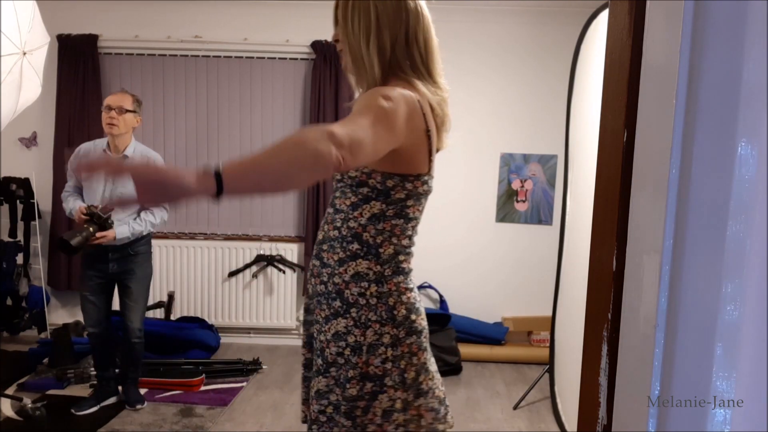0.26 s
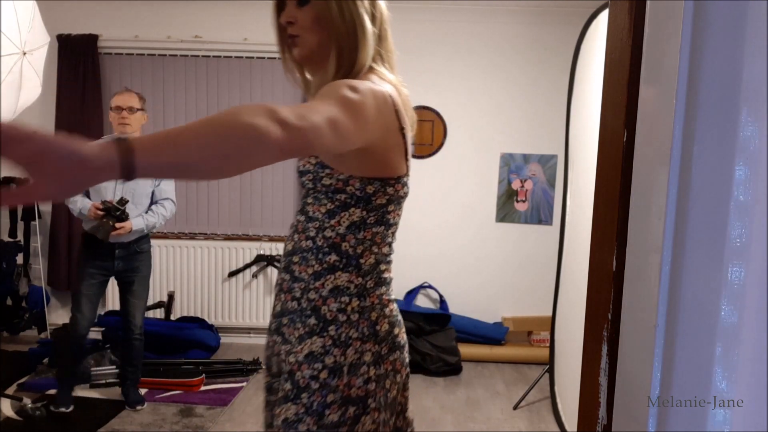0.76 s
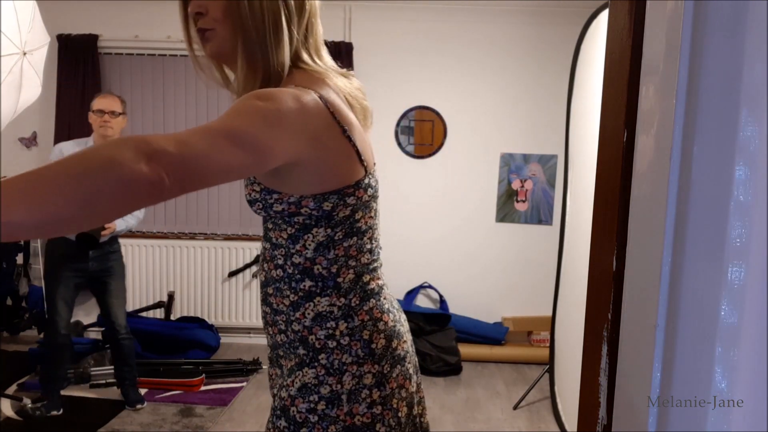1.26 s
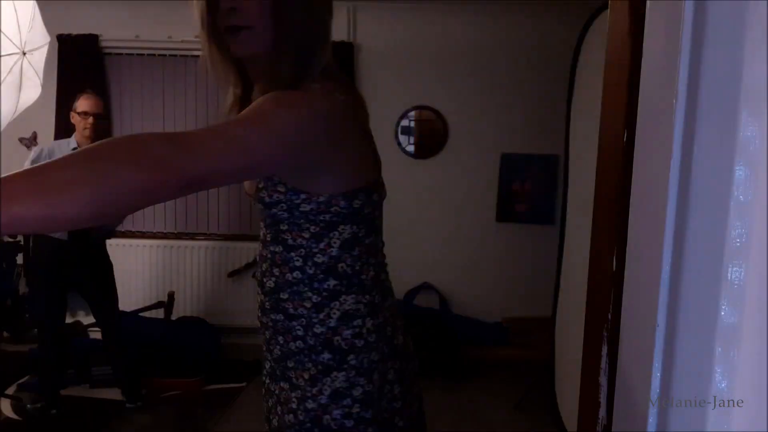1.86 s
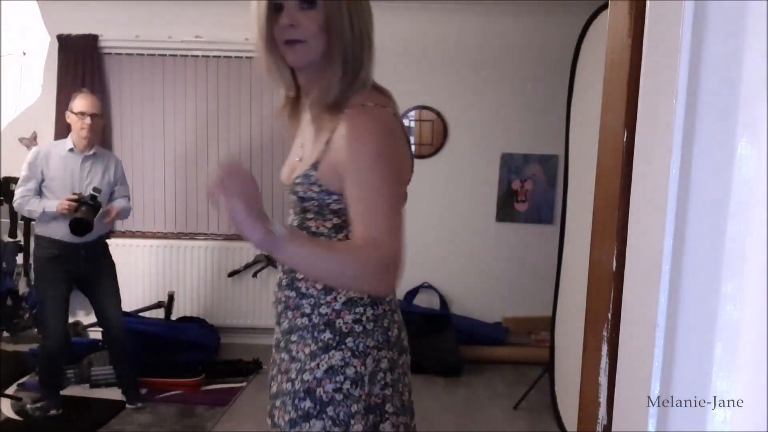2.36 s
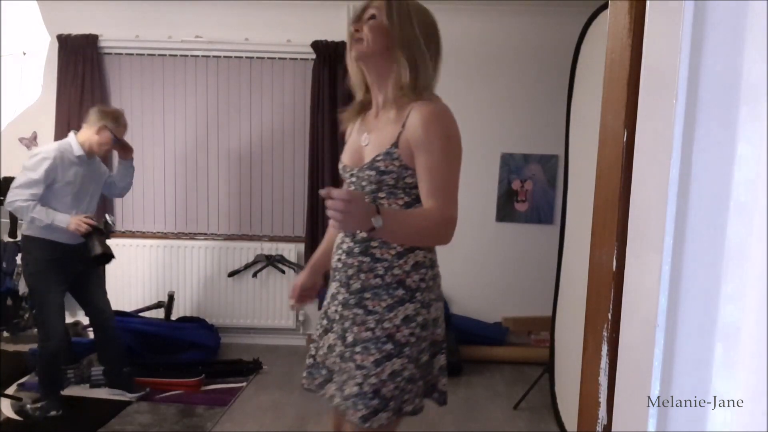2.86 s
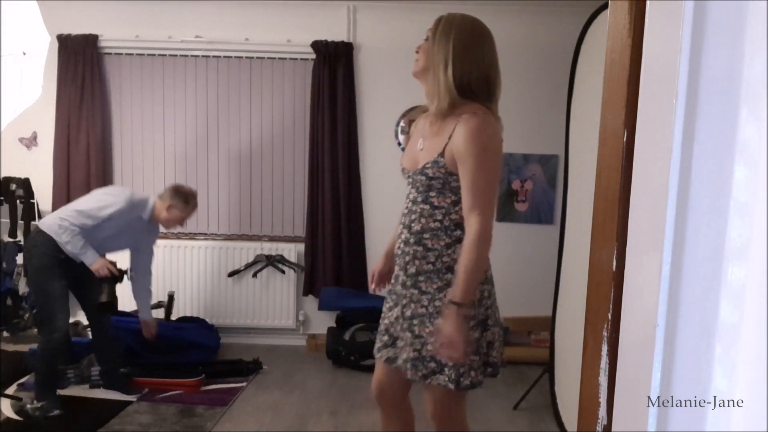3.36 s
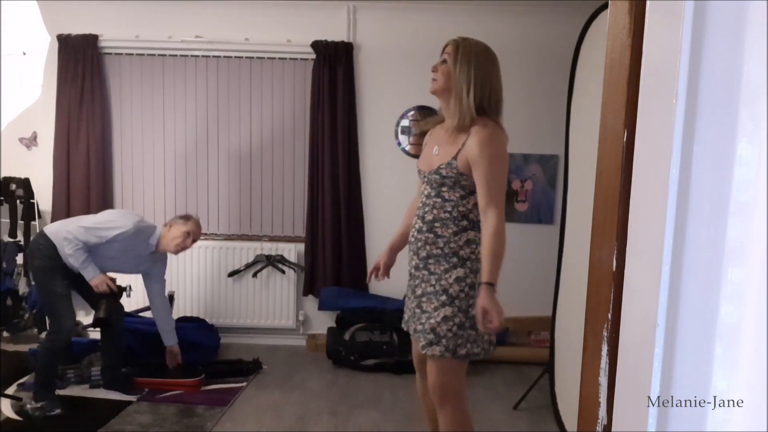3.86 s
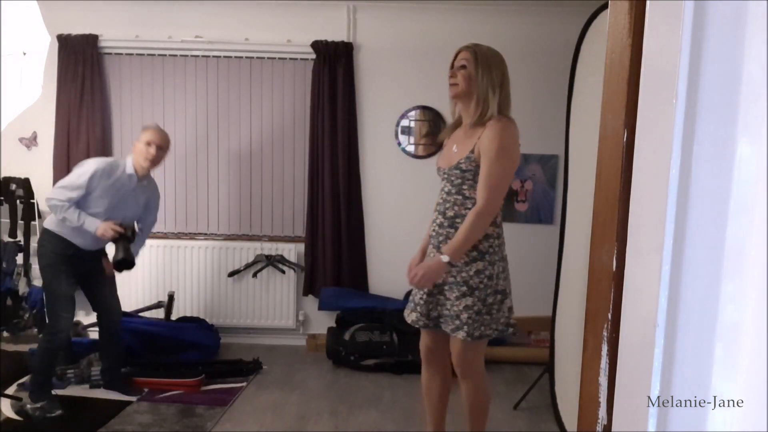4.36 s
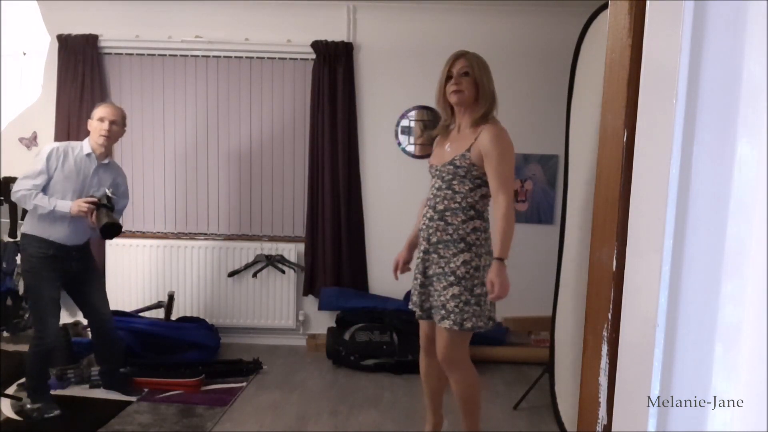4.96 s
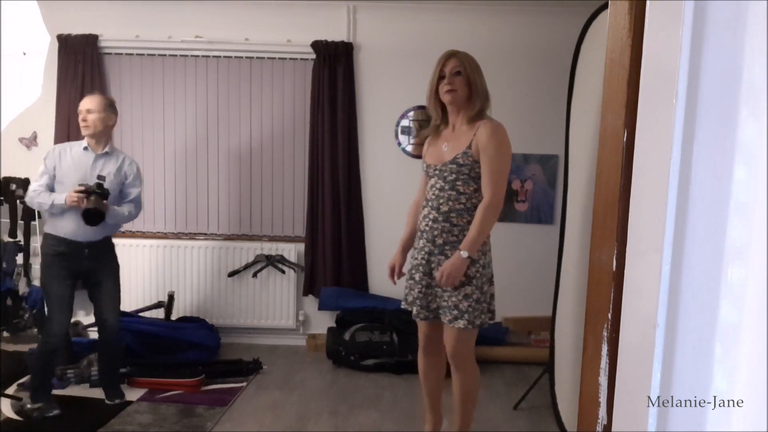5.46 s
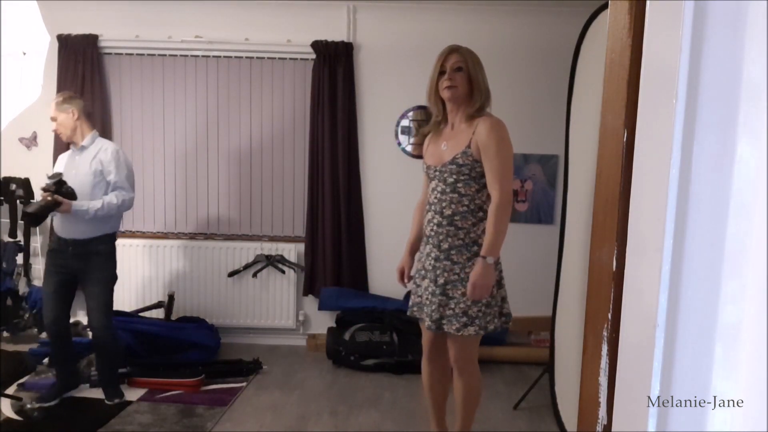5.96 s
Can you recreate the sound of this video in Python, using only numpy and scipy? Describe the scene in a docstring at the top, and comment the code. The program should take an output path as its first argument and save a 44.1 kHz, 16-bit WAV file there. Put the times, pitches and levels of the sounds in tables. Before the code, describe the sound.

Hard-heeled shoes knock irregularly on laminate in a small furnished room, with faint scuffs, a sharp clack and a brief board creak over low hiss.

```python
"""Hard-heeled shoes knock on a laminate floor in a small furnished room as someone steps about.
Each touch is a pulse shaped in six bands, which rings the floor modes and a decaying-noise room; joists thump below.
Soles scuff as swelling noise, ticks, clacks and snaps leave thin rings, a board creaks and squeaks.
Behind lie noise hiss and a low building hum, picked up by a phone microphone with a noise suppressor
that lets its hiss swell with every sound and cuts the tails short."""
import sys
import numpy as np
from scipy import signal
from scipy.io import wavfile
from scipy.ndimage import uniform_filter1d

SR = 44100
rng = np.random.default_rng(int(sys.argv[2]) if len(sys.argv) > 2 else 0)


def output_pcm(signal):
    """Save a mono or channel-first signal as 16-bit PCM at the path in sys.argv[1].

    Samples are clipped to [-1, 1] before scaling.
    """
    pcm = np.clip(np.atleast_2d(signal).T, -1, 1) * 32767
    wavfile.write(sys.argv[1], SR, np.round(pcm).astype(np.int16))


def volts_from_decibels(level):
    """Turn decibel levels (scalar or array-like) into linear amplitude factors."""
    exponent = np.asarray(level, float) / 20
    return 10 ** exponent


N = 274037  # length in samples

# heel and sole knocks: t/s, level/dB, dullness/(dB per octave), grit/dB, crispness of the first blow/dB,
# hollowness as extra low midrange/dB
KNOCKS = [(0.0894, -30, 20.5, -60, -7.5, 15), (0.1613, -28, 1.56, -95, 6.5, 4.5),
          (0.2801, -52.5, -6, -52, -7, 1.5), (0.6445, -39, 8, -56.5, 0, -5), (0.669, -26, 6.5, -52, 9, 4.5),
          (0.853, -56, 20, -102, -18, -1), (2.422, -33.5, 4, -89, 7, -1), (2.473, -47.5, 25, -55, -1, 0),
          (2.5419, -29, 3, -43.5, 9.5, 0.5), (3.078, -30, 3.5, -53.5, -2, -7.5),
          (3.1579, -23.5, 0, -62, 6.5, -2.6), (3.65, -56, 1.5, -57.5, 0, 8.5),
          (3.717, -30, 3, -43.5, 5, -10.5), (3.817, -21.5, 2, -74.5, 1, -1.3),
          (4.274, -41.5, 25.5, -47, -1.5, 6.5), (4.306, -17.5, 1.5, -38.5, 5, 0.5),
          (4.806, -41.5, 7.5, -70, 0, -5), (4.8265, -24.5, 1.5, -99, 2, -0.2), (5.03, -40, 7, -59, -9, 2),
          (5.3927, -27, 3, -64, -2, -3.5), (5.792, -57.5, 0, -77.5, -6.5, -7),
          (6.031, -29.5, 5.5, -63.5, -10, 4.5)]
# bright snaps: t/s, level/dB, strongest f/Hz, fall below/(dB per octave), fall above/(dB per octave)
SNAPS = [(3.9159, -26.5, 1416, 8.5, 1.67), (4.334, -46, 700, 18, 1.5), (4.806, -52.5, 6390, 5, 2.5),
         (5.863, -59.5, 6150, 4.5, 3.5)]
SNAP_CRISP_DB = -4
# bands of a touch: low f/Hz, high f/Hz, direct level/dB, room level/dB, share of a firm knock/dB, share of grit/dB
TOUCH_BANDS = [(123.5, 439, 5.5, -8.5, -0.5, -49), (387.3, 916, 8, -9.5, 1.34, -33.5),
               (935, 1784, 7.5, -3, -4, -2), (1710, 5400, 15, 3.5, -16.5, 2),
               (4950, 8090, 20.5, 2.5, -30, -3.5), (9860, 15540, 21.5, 14, -39.5, -9.5)]
# where the walker stands: t/s, distance (0 near, 1 far), give of the boards there as extra bass/dB
WALK = [(0.1, 0.11, 7), (0.7, 0, -0.5), (2.5, 0, -6), (3.2, 0.93, 0), (3.8, 0.96, -1.5), (4.3, 0.78, -3),
        (4.8, 0.39, -14.5), (5.4, 0.59, 5.5), (6.1, 0.38, -14)]
# floor and room ring: f/Hz, level from the near spot/dB, level from the far spot/dB, t60/s before the cap below
FLOOR_MODES = [(132.1, -10.5, -9, 0.6), (164.6, -23.5, -11.5, 0.56), (193.3, -16, -5, 0.53),
               (223.3, -9, -2.5, 0.96), (279.7, 0, 4.5, 0.11), (291.7, -9.5, -2.5, 0.72),
               (348, -15, -10.5, 0.87), (375.4, -1, -32.5, 0.46), (399.7, 7.5, -11.5, 0.26),
               (488.6, -0.5, -7, 0.06), (529, -6.5, -20.5, 0.36), (625.5, -3.5, -12, 0.35),
               (721, -17, -8, 0.43), (872, -25.5, 1.5, 0.086), (965, -4, -3, 0.15), (1240, -19, -11, 0.18),
               (1535, -12.5, -16.5, 0.51), (2290, -9, -18.5, 0.78)]
LONGEST_RING_S = .4
MODE_SPREAD_DB = 3.3  # random spread of each mode's strength from touch to touch
# how long the room holds each pitch: f/Hz, t60/s
ROOM_T60 = [(150, 0.46), (600, 0.34), (2000, 0.39), (6000, 0.39), (11000, 0.32), (16000, 0.26)]
# tone of the reflections: f/Hz, relative level/dB
ROOM_COLOUR = [(200, -5.5), (500, 5.5), (900, 0.5), (1600, -8), (2000, -1.5), (5000, 1), (8500, 5),
               (11000, -0.5), (15500, -2)]
# the joists give under each knock
THUMP_HZ, THUMP_DB, THUMP_T60_S = 78, -30.5, 0.11
# short narrow clacks of hard parts: t/s, level/dB before the band-pass, f/Hz, t60/s
CLACKS = [(1.734, -41, 6860, 0.0045), (1.811, -19.5, 6030, 0.006), (1.811, -26, 8300, 0.003),
          (1.811, -11, 12700, .001), (1.815, -34, 1770, .003), (2.488, -29, 4630, .002),
          (2.563, -43, 4630, 0.0018), (4.465, -26, 3710, .004)]
CLACK_ROOM_DB = -24  # what a clack sends into the room
# thin ringing tones of ticks and of a snap: t/s, level/dB, f/Hz, t60/s
TICKS = [(1.16, -55, 6750, .35), (1.298, -63, 13050, .15), (1.561, -61, 10480, .2), (0.281, -29, 1050, .06),
         (3.918, -36, 1290, .4), (3.918, -42, 2050, .45), (3.918, -44, 6400, .3)]
# a board creaks under load: start t/s, end t/s, level/dB
CREAK = (3.648, 3.712, -42)
CREAK_SLIPS_PER_S = 1600
# resonances of the creaking board: f/Hz, level/dB, t60/s
CREAK_MODES = [(600, -4, .03), (715, -2, .035), (920, -4, .04), (2200, -18, .04)]
# the joint sings briefly: start t/s, end t/s, level/dB, from f/Hz, to f/Hz
SQUEAK = (3.658, 3.697, -51, 1590, 1510)
# sole and cloth sliding: start t/s, peak t/s, end t/s, peak level/dB before the low cut, lowest f/Hz
SCUFFS = [(1.04, 1.1, 1.26, -42, 1200), (1.9, 2.0, 2.16, -44, 4000), (2.92, 3.04, 3.09, -57, 2000),
          (5.03, 5.07, 5.17, -54, 1200)]
# tone of the sliding: f/Hz, relative level/(dB per Hz)
SCUFF = [(710, -61), (1200, -19), (2020, -8), (4260, 1.5), (8820, -11), (12500, -5), (16000, -15)]
# tone of the hiss: f/Hz, relative level/(dB per Hz)
HISS = [(41, -43), (70, -20), (101, -7), (129, -16.5), (256, -19.5), (606, -23), (815, -27.5),
        (1070, -26.5), (2120, -29), (5750, -32.5), (6450, -31), (7560, -44), (16000, -22.5)]
HISS_OPEN_DB = -57  # with the suppressor open
# building hum: f/Hz, width/Hz, level/dB
HUM = [(43.26, 2, -59), (65.5, 5.4, -69.5), (208, 0.59, -72)]
# how alike left and right are in noise: f/Hz, likeness (0-1)
LIKENESS = [(60, .9), (150, .97), (300, .9), (600, .68), (1200, .35), (2500, .08), (8000, 0)]
PAN_DB = -2  # left relative to right
# suppressor: turns down when closed, opens fully between two levels
CLOSED_DB, OPEN_AT_DB, SHUT_AT_DB, ATTACK_S, RELEASE_DB_PER_S = -4.5, -35, -49.5, 0.019, 172.5


def at_hz(points, hz):
    """Reads a table along log frequency."""
    table_hz, values = np.transpose(points)
    return np.interp(np.log(hz), np.log(table_hz), values)


def band(x, low_hz, high_hz):
    """Butterworth band-pass."""
    edges = np.clip([low_hz, high_hz], 10, .45 * SR)
    return signal.sosfilt(signal.butter(2, edges, "band", fs=SR, output="sos"), x)


def ring(clicks, hz, t60):
    """A resonance: a unit click sets a decaying sine of height 1 ringing."""
    r = volts_from_decibels(-60 / (t60 * SR))
    w = 2 * np.pi * hz / SR
    return signal.lfilter([0, np.sin(w)], [1, -2 * r * np.cos(w), r * r], clicks + 1e-18)


def clicks_at(times, heights):
    """A click train."""
    out = np.zeros(N)
    np.add.at(out, np.round(np.asarray(times) * SR).astype(int), heights)
    return out


def stereo_noise(spectrum, size, t60=None):
    """Third-octave bands of noise, each with its level, likeness and, if given, decay; rms 1 before decay."""
    out, power = 0, 0
    edges = 60 * 2 ** (np.arange(26) / 3)
    white = rng.standard_normal((2, 2, size))  # neighbouring bands take turns on two noises
    for k, (low, high) in enumerate(zip(edges, edges[1:])):
        mid, side = band(white[k % 2], low, high)
        hz = np.sqrt(low * high)
        alike = np.clip(at_hz(LIKENESS, hz), 0, 1)
        stereo = np.sqrt(1 + alike) * mid + np.sqrt(1 - alike) * side * [[1], [-1]]
        part = volts_from_decibels(at_hz(spectrum, hz)) * stereo
        power += np.mean(part ** 2)
        if t60:
            part = part * volts_from_decibels(-60 * np.arange(size) / SR / at_hz(t60, hz))
        out = out + part
    return out / np.sqrt(power)


def touches():
    """Each knock, snap or clack is heard direct and through the room; knocks and snaps also ring the floor."""
    times, levels, crisp_db = band_levels()
    direct = clacks()
    sent = volts_from_decibels(CLACK_ROOM_DB) * direct
    for db, (low_hz, high_hz, direct_db, room_db, *_) in zip(levels, TOUCH_BANDS):
        direct_clicks = clicks_at(times, -volts_from_decibels(db + direct_db + crisp_db))
        room_clicks = clicks_at(times, -volts_from_decibels(db + room_db))
        pulses = np.array([direct_clicks, room_clicks])
        for _ in range(2):
            pulses = band(pulses, low_hz, high_hz)
        pulses = pulses * SR / (4 * (high_hz - low_hz))  # keeps pulse height alike in wide and narrow bands
        direct, sent = direct + pulses[0], sent + pulses[1]
    mix = direct + floor_modes(times, levels) + room(sent)
    # the thin boards radiate little below their lowest mode
    return signal.sosfilt(signal.butter(5, 112, "high", fs=SR, output="sos"), mix)


def band_levels():
    """Times, band levels and crispness: knocks fall off by dullness and carry grit, snaps peak at one pitch."""
    low_hz, high_hz, _, _, firm_db, grit_share_db = np.transpose(TOUCH_BANDS)[:, :, None]
    octave = np.log2(low_hz * high_hz) / 2  # band centres
    knock_s, db, dull, grit_db, crisp_db, hollow_db = np.transpose(KNOCKS)
    firm = volts_from_decibels(db + firm_db - dull * (octave - octave[0]))
    grit = volts_from_decibels(grit_db + grit_share_db)
    knocks = np.hypot(firm, grit)
    knocks[1] *= volts_from_decibels(hollow_db)
    snap_s, db, hz, below, above = np.transpose(SNAPS)
    away = octave - np.log2(hz)
    snaps = db - np.where(away < 0, -below * away, above * away)
    times = np.r_[knock_s, snap_s]
    levels = np.c_[20 * np.log10(knocks), snaps]
    return times, levels, np.r_[crisp_db, np.full(len(SNAPS), SNAP_CRISP_DB)]


def floor_modes(times, levels):
    """Each touch sets the floor's modes ringing, by where the walker stands, with a random spread."""
    walk_s, far, give_db = np.transpose(WALK)
    far = np.clip(np.interp(times, walk_s, far), 0, 1)
    give_db = np.interp(times, walk_s, give_db)
    tops = np.array(TOUCH_BANDS)[:, 1]
    spread = rng.standard_normal((len(times), len(FLOOR_MODES)))
    out = 0
    for k, (hz, near_db, far_db, t60) in enumerate(FLOOR_MODES):
        db = levels[np.searchsorted(tops, hz)] + near_db + far * (far_db - near_db)
        db = db + MODE_SPREAD_DB * spread[:, k]
        db = db + give_db * (hz < 210)  # only the bass modes feel the give
        push = band(clicks_at(times, -volts_from_decibels(db)), hz / 2, hz * 2)  # a mode swells over a cycle, without a click
        out = out + ring(push, hz, min(t60, LONGEST_RING_S))
    return out


def room(sent):
    """Reflections as decaying noise: every standing spot has a pattern of its own."""
    walk_s = np.array(WALK)[:, 0]
    arrivals = np.r_[0, ((walk_s[1:] - .2) * SR).astype(int), N]
    size = SR // 2
    thicken = 1 - np.exp(-np.arange(size) / SR / 0.0038)  # reflections take a moment to thicken
    out = np.zeros((2, N + SR))
    for a, b in zip(arrivals, arrivals[1:]):
        tail = thicken * stereo_noise(ROOM_COLOUR, size, ROOM_T60)
        out[:, a:b + size - 1] += signal.fftconvolve(sent[None, a:b], tail, axes=1)
    return out[:, :N]


def thump():
    """The joists give under each knock: a weak deep swing below the boards' own sound."""
    times, db = np.transpose(KNOCKS)[:2]
    walk_s, _, give_db = np.transpose(WALK)
    db = db + np.interp(times, walk_s, give_db)
    push = band(clicks_at(times, -volts_from_decibels(db + THUMP_DB)), THUMP_HZ / 2, THUMP_HZ * 2)
    return ring(push, THUMP_HZ, THUMP_T60_S)


def clacks():
    """A clack is one very short ring, with little far below or above its pitch."""
    return sum(band(ticks([row]), row[2] * 0.75, row[2] / 0.77) for row in CLACKS)


def ticks(table):
    """Each row is one thin ring; several may sound together."""
    return sum(ring(clicks_at([s], volts_from_decibels(db)), hz, t60) for s, db, hz, t60 in table)


def creak():
    """Dense uneven slips in a joint ring the board's few resonances, fading in and out."""
    start, end, db = CREAK
    slips = rng.standard_normal(N) * (rng.random(N) < CREAK_SLIPS_PER_S / SR)
    board = sum(volts_from_decibels(mode_db) * ring(slips, hz, t60) for hz, mode_db, t60 in CREAK_MODES)
    corners = [start, start + .006, start + .03, end, end + .02]
    shape = np.interp(np.arange(N) / SR, corners, [0, .5, 1, .6, 0])
    return volts_from_decibels(db) * shape * board / board.std()


def squeak():
    """The joint sings: a thin, slightly unsteady tone that sags in pitch."""
    start, end, db, from_hz, to_hz = SQUEAK
    along = np.clip((np.arange(N) / SR - start) / (end - start), 0, 1)
    waver = band(rng.standard_normal(N), 20, 120)
    hz = from_hz + along * (to_hz - from_hz)
    hz = hz * (1 + .012 * waver / waver.std())
    swell = np.sqrt(np.sin(np.pi * along) + 1e-18)
    return volts_from_decibels(db) * swell * np.sin(2 * np.pi * np.cumsum(hz) / SR)


def scuffs():
    """Soft bright friction noise that swells and fades; each scuff has its own low cut, so some sound thinner."""
    out, noise = 0, stereo_noise(SCUFF, N)
    for start, peak, end, db, low_hz in SCUFFS:
        phase = np.interp(np.arange(N) / SR, [start, peak, end], [0, np.pi / 2, np.pi])
        swell = np.abs(np.sin(phase)) ** 1.58
        out = out + volts_from_decibels(db) * swell * band(noise, low_hz, SR / 2)
    return out


def hiss():
    """The microphone's steady noise, at its level with the suppressor open."""
    return volts_from_decibels(HISS_OPEN_DB) * stereo_noise(HISS, N)


def rumble():
    """Low building hum: noise in a few narrow resonances, levelled so that it only wavers."""
    out = 0
    for hz, width_hz, db in HUM:
        # a second of run-up lets the resonance settle
        hum = ring(rng.standard_normal((2, N + SR)), hz, 2.2 / width_hz)[:, SR:]
        hum = hum[0] + 0.18 * hum[1] * [[1], [-1]]  # nearly mono
        swell = uniform_filter1d(hum.mean(axis=0) ** 2, size=4410)
        out = out + volts_from_decibels(db) * hum / np.sqrt(swell + 0.07 * swell.mean())
    return out


def scene():
    """All sources together, a little to the right."""
    steps = touches() + thump()
    details = ticks(TICKS) + creak() + squeak() + scuffs()
    background = hiss() + rumble()
    return (steps + details + background) * volts_from_decibels(np.array([[PAN_DB / 2], [-PAN_DB / 2]]))


def top_cut(x):
    """Nothing passes above the cut-off."""
    return signal.sosfilt(signal.butter(12, 17000, fs=SR, output="sos"), x)


def record(dry):
    """The suppressor follows the midrange level: quiet dips all above the deep bass, loud lifts that bass."""
    bass = signal.sosfilt(signal.butter(4, 65, fs=SR, output="sos"), dry)
    upper = signal.sosfilt(signal.butter(4, 65, "high", fs=SR, output="sos"), dry)
    heard = band(dry.mean(axis=0), 220, 8700)
    level = 10 * np.log10(uniform_filter1d(heard ** 2, size=441) + 1e-12)
    # peaks are held and let down at a steady rate in dB
    fall = RELEASE_DB_PER_S * np.arange(N) / SR
    held = np.maximum.accumulate(level + fall) - fall
    opening = np.clip((held - SHUT_AT_DB) / (OPEN_AT_DB - SHUT_AT_DB), 0, 1)
    r = np.exp(-1 / (ATTACK_S * SR))
    gain_db = CLOSED_DB * (1 - signal.lfilter([1 - r], [1, -r], opening))
    mix = upper * volts_from_decibels(gain_db) + bass * volts_from_decibels(1.5 * (gain_db - CLOSED_DB))
    mix = signal.sosfilt(signal.cheby2(10, 40, 16400, fs=SR, output="sos"), mix)  # steep treble limit
    return top_cut(mix)


dry = scene()
out = record(dry)
output_pcm(out)
```